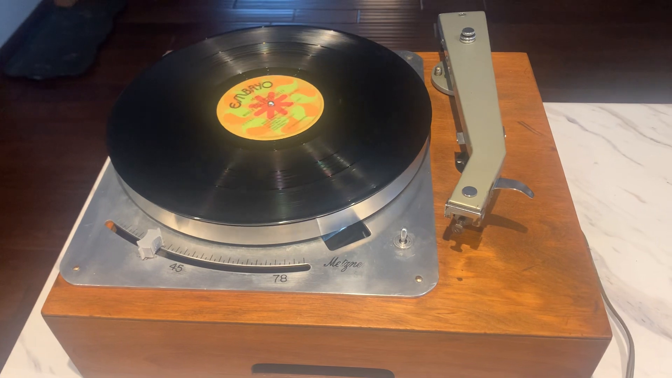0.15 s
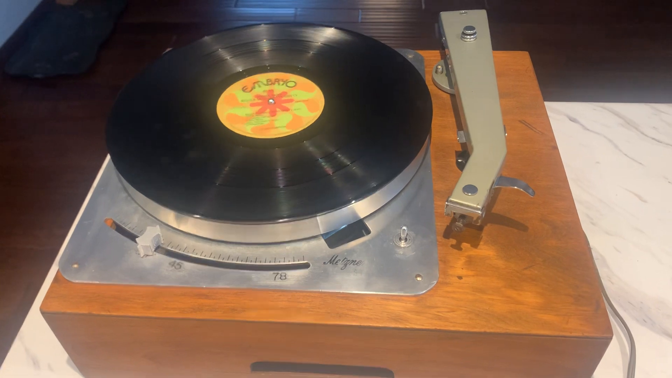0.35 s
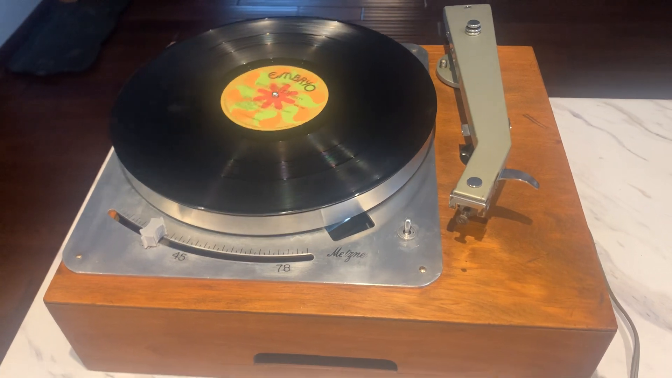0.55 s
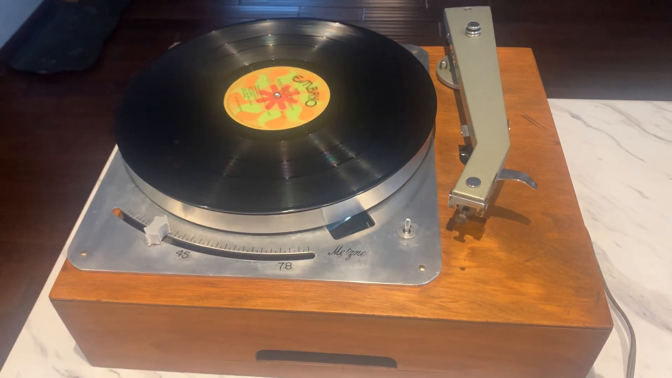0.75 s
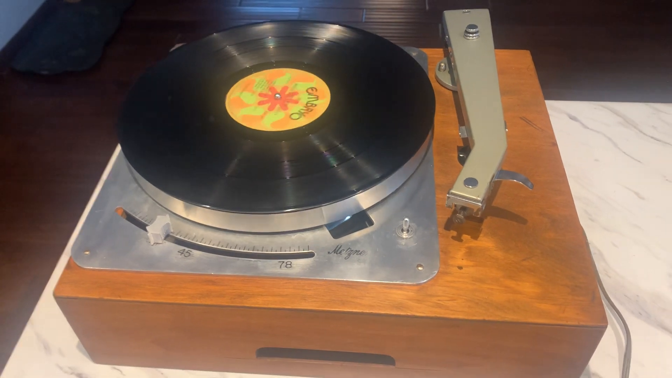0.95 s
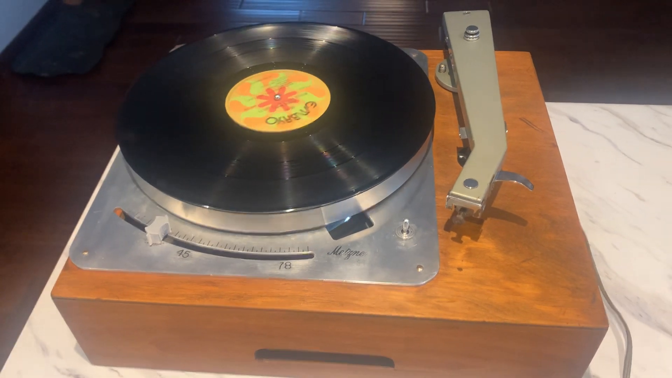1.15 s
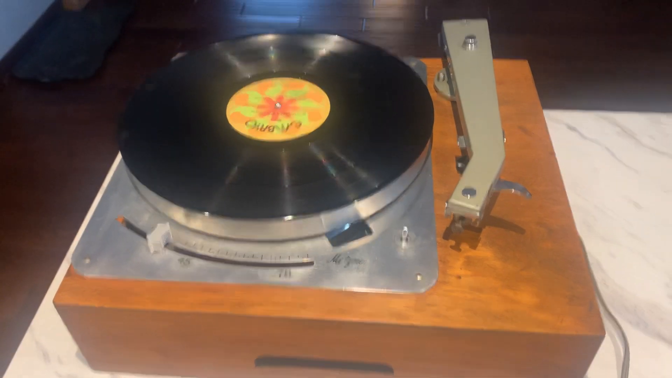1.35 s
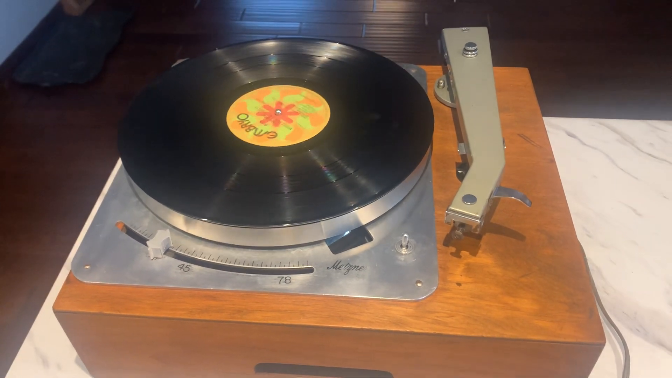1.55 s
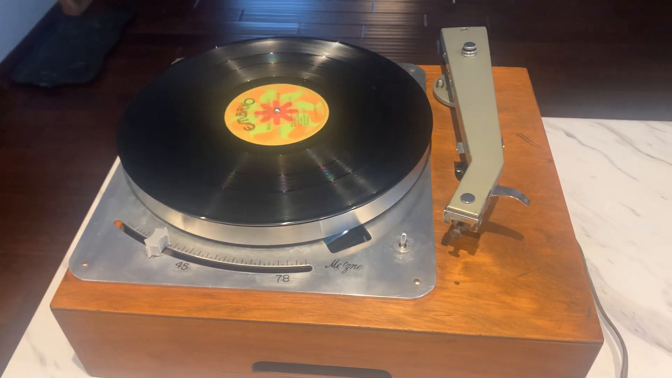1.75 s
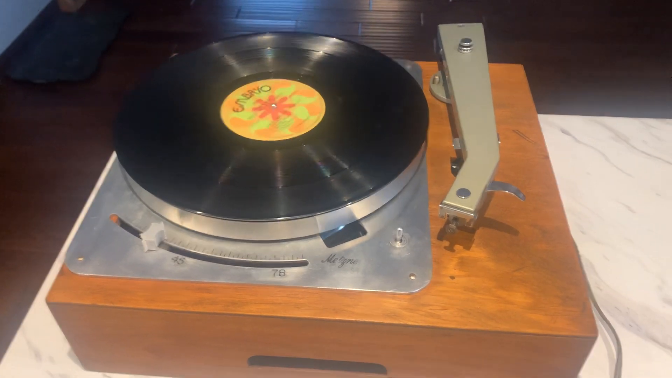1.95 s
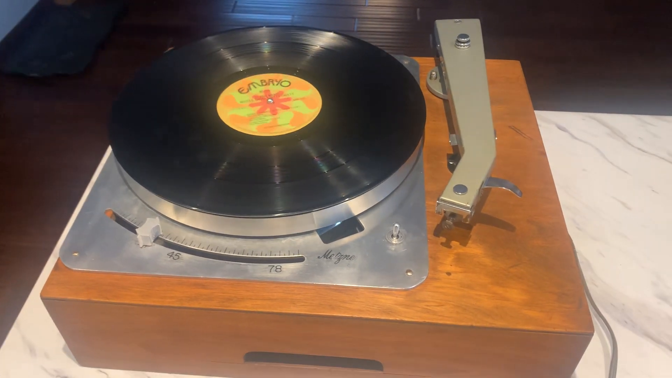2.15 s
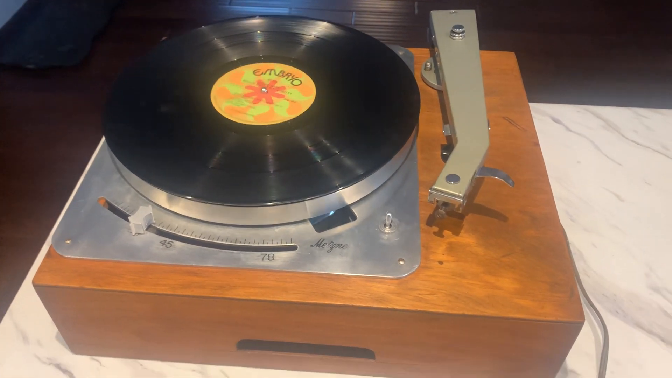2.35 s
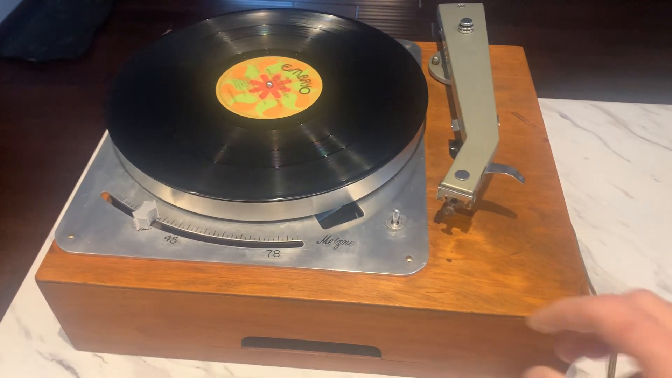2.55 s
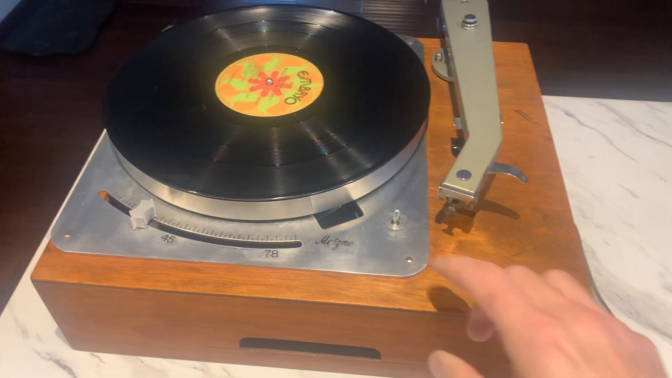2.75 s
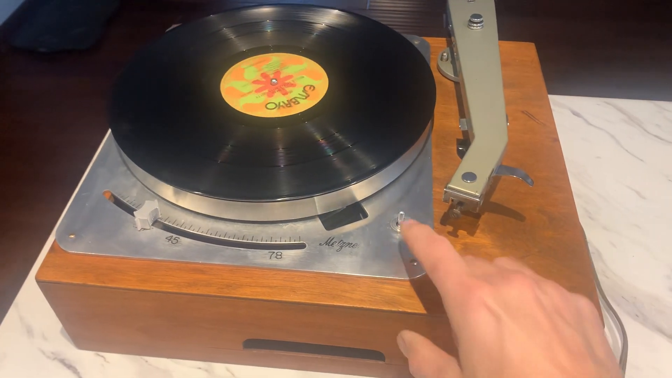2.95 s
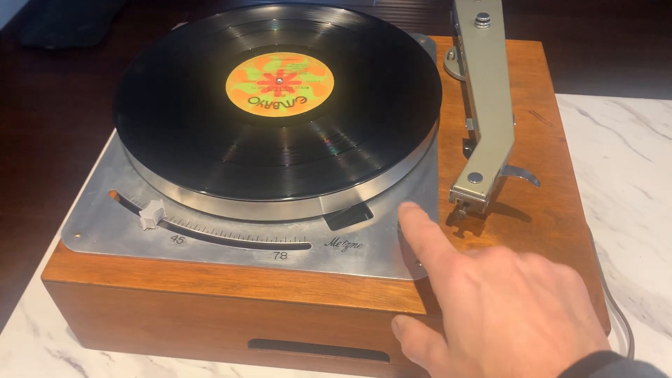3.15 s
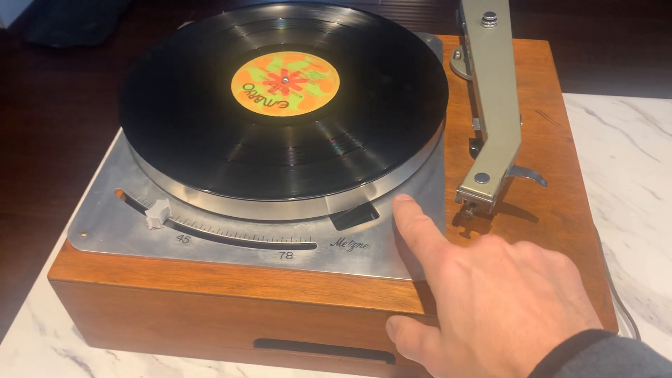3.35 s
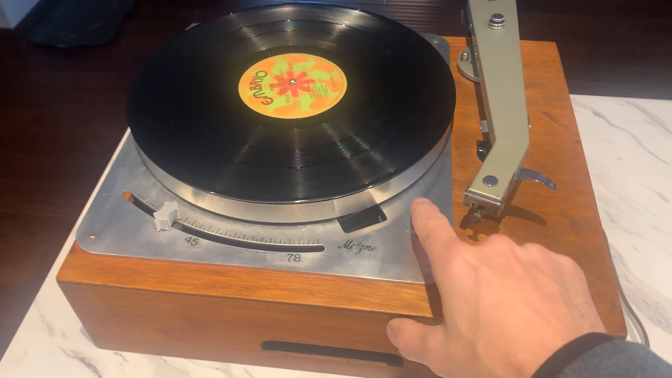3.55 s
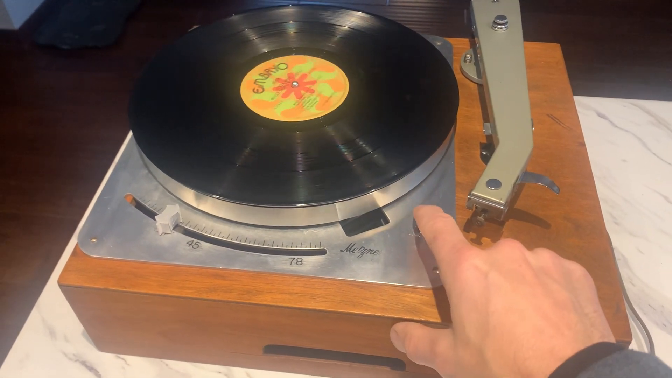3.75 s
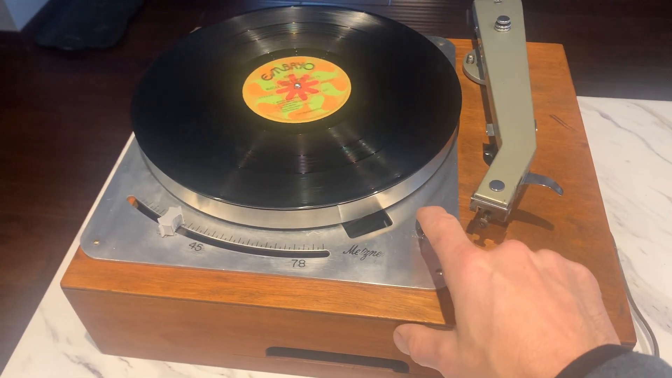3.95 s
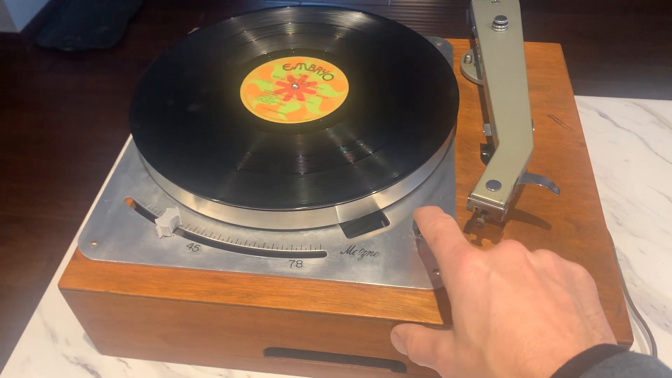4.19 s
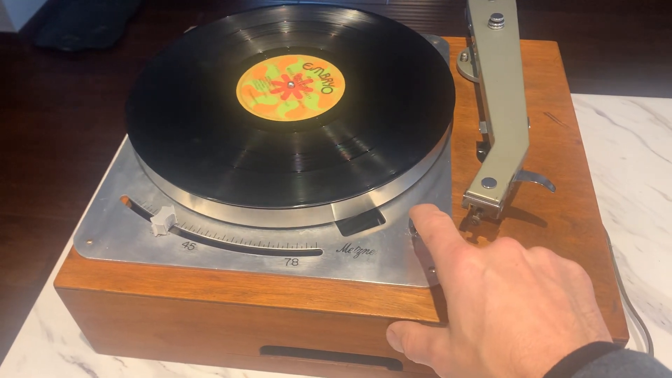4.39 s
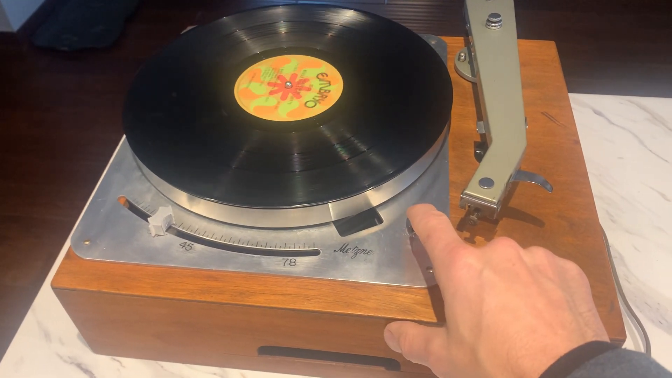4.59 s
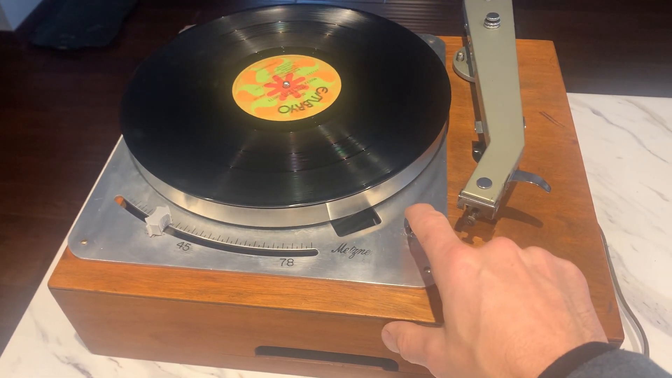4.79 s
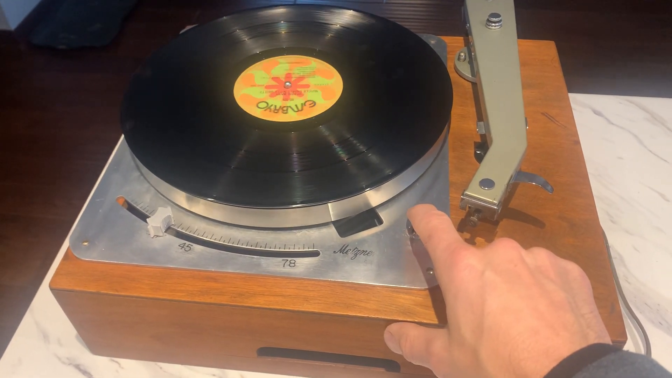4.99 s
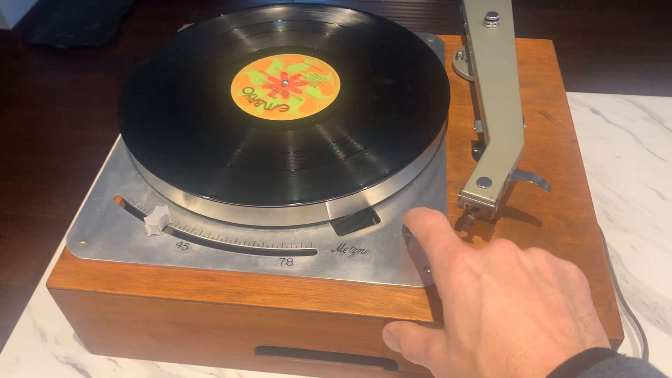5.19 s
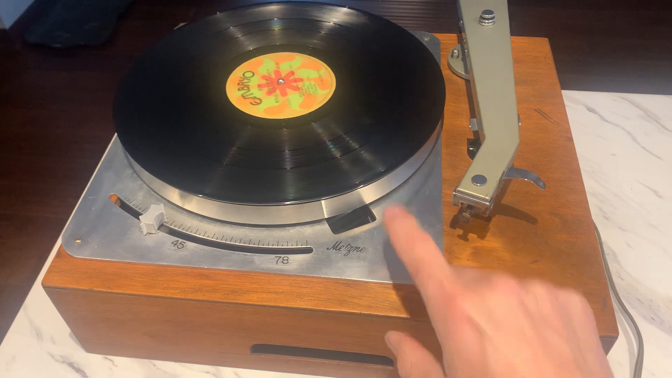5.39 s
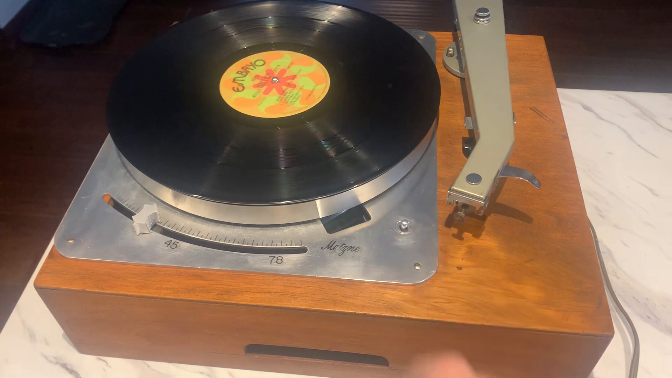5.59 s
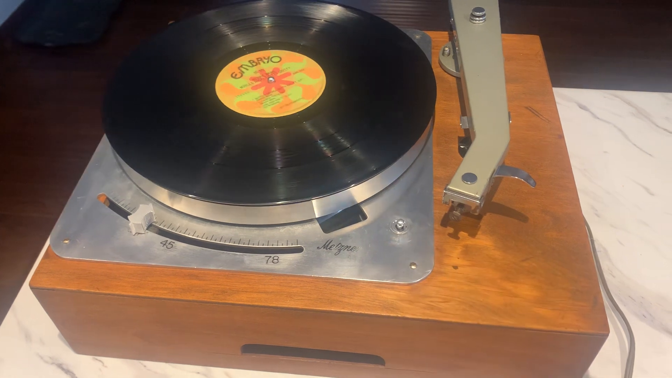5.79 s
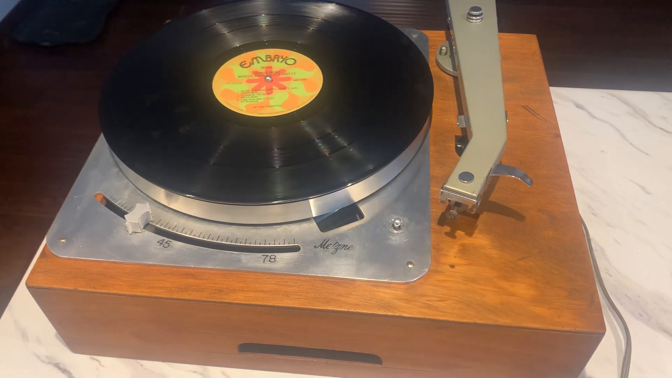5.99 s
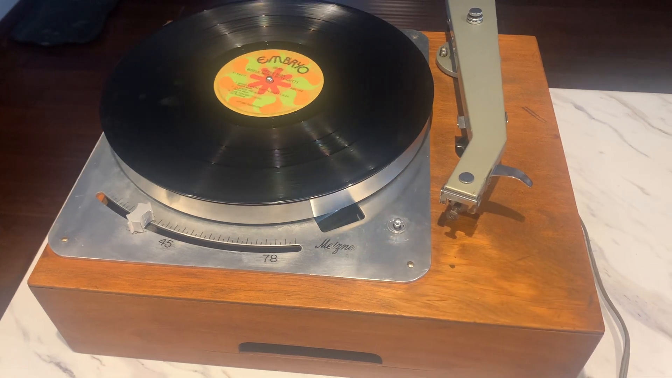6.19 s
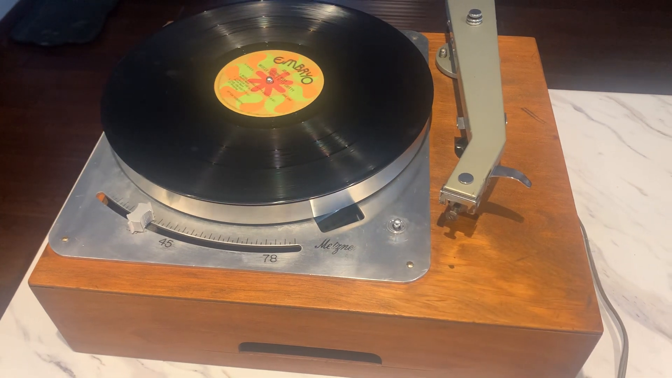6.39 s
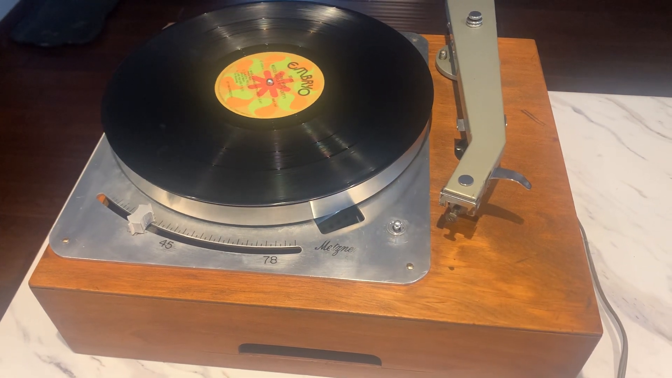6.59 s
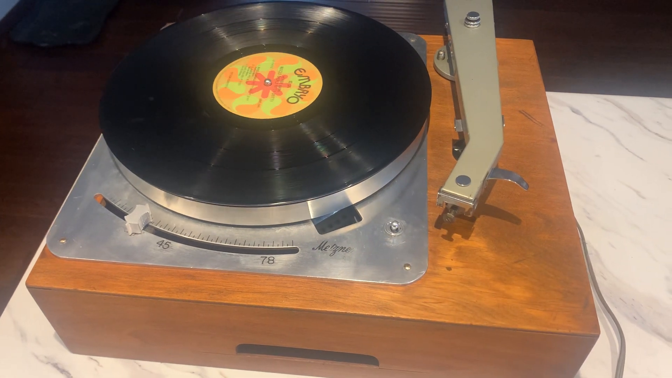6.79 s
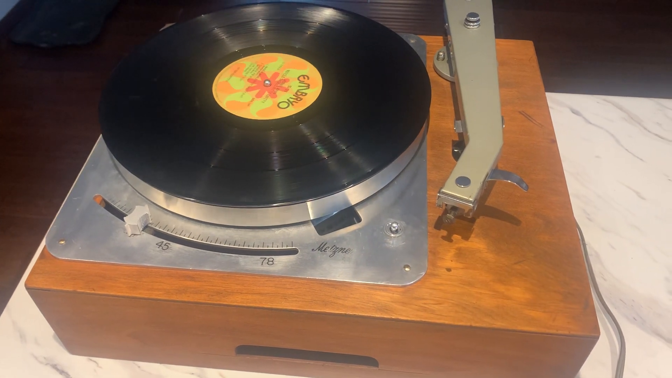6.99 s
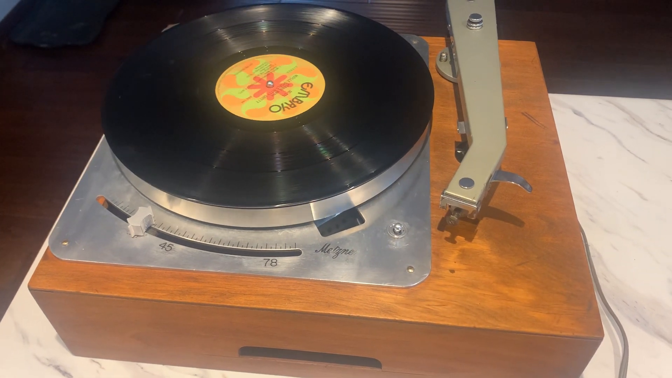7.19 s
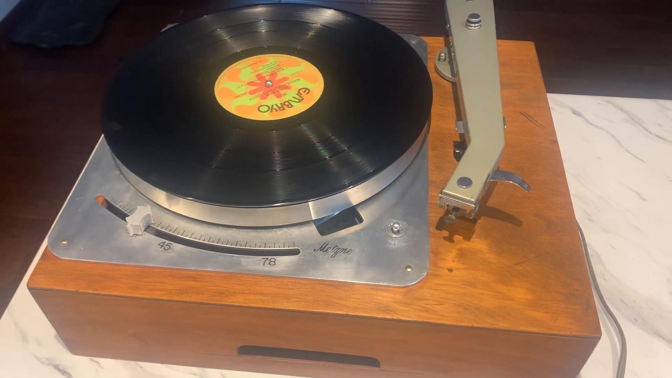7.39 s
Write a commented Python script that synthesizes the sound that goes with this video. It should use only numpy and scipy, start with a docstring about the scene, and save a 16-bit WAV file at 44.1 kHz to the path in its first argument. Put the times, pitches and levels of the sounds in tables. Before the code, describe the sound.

From the start, an old turntable motor gives a low, steady 120 Hz hum with soft, slightly uneven bearing rumble, over a faint low room drone. Across the room a clock ticks quietly about once a second, from 0.2 s to the end, each step a tiny cluster of dry clicks blurred by the room. Soft sleeve rustles and small grip knocks come close to the microphone at 0.2-0.7 and 1.0-1.2 s; a stronger dull double knock with clicks falls at 1.97 s, and a tiny click at 2.25 s. At 2.85 s a fingertip lands with a faint nail tick and a muffled low thud. At 5.1 s the toggle switch snaps, by far the loudest event: a bright crack with woody, metallic body, thin steel ringing and a short room echo. The hum and rumble die within half a second, leaving low room drone and clearer ticking until about 7.4 s.

```python
"""A room with a stone table, where an old turntable hums until a finger on its toggle switch snaps it off.
The motor is a sum of mains harmonics over bearing noise; the snap is bouncing noise bursts, and rings the deck's modes.
A clock across the room steps once a second, as damped noise carried by the reverberation, over a low steady drone.
The hand that holds the camera knocks its case, as decaying sines and clicks, and a sleeve brushes as shaped noise."""
import sys
import numpy as np
from scipy import signal
from scipy.fft import rfft, irfft, next_fast_len
from scipy.io import wavfile
from scipy.ndimage import uniform_filter1d, map_coordinates

SR = 44100
rng = np.random.default_rng(int(sys.argv[2]) if len(sys.argv) > 2 else 0)


def master(y):
    """Save y as 16-bit WAV."""
    cut = np.clip(np.atleast_2d(y).T, -1, 1)
    pcm = np.round(cut * 32767)  # scale
    wavfile.write(sys.argv[1], SR, pcm.astype(np.int16))


N = 328015  # length of the scene in samples


def amp(db):
    """Level and amplitude: 20 dB is a factor of ten."""
    return 10 ** (np.asarray(db) / 20)


def unit(x):
    """Normalization: scale to rms 1."""
    return x / np.sqrt(np.mean(x ** 2) + 1e-20)


def along(points, hz):
    """Logarithmic pitch scale: interpolate (Hz, value) points on a log-frequency axis."""
    point_hz, value = np.transpose(points)
    return np.interp(np.log(hz + 1), np.log(point_hz + 1), value)


def seconds(size):
    """Sampling: the time of each sample."""
    return np.arange(size) / SR


def fade(t, t60):
    """Exponential decay: from t = 0, the level falls 60 dB in t60 seconds."""
    return (t >= 0) * np.exp(-np.log(1000) * np.abs(t) / t60)


def wobble(rate):
    """Slow random fluctuation: a smooth curve through rate random knots a second."""
    knots = rng.standard_normal(int(N * rate / SR) + 4)
    return map_coordinates(knots, [seconds(N) * rate])


def filtered(x, response):
    """Linear filtering: multiply the spectrum by a response of frequency."""
    size = x.shape[-1]
    padded = next_fast_len(size + SR // 4)
    spectrum = rfft(x, padded) * response(np.fft.rfftfreq(padded, 1 / SR))
    return irfft(spectrum, padded)[..., :size]


# likeness of the two microphone ports in a diffuse field, clipped to 1 when read
# columns: pitch_hz [Hz], correlation [1]
COHERENCE = [(60, 1.1), (140, 0.68), (290, 0.92), (640, 0), (1400, 0), (15000, 0)]


def noise(spectrum, size):
    """Diffuse-field coherence: stereo noise of rms 1, alike in the bass and unrelated in the treble."""
    def colour(hz):
        turn = np.arccos(np.clip(along(COHERENCE, hz), -1, 1)) / 2
        return amp(along(spectrum, hz)) * np.array([np.cos(turn), np.sin(turn)])

    mid, side = filtered(rng.standard_normal((2, size)), colour)
    return unit(np.array([mid + side, mid - side]))


def cluster(hz, width_hz, size):
    """Modal overlap: many close modes beat against each other as narrow-band stereo noise of rms 1."""
    band = lambda f: np.exp(-((f - hz) / width_hz) ** 2 / 2)
    return unit(filtered(rng.standard_normal((2, size)), band))


def pan(lean_db):
    """Interaural level difference: left and right gains, lean_db apart."""
    return amp(np.array([lean_db, -lean_db]).reshape(2, -1) / 2)


def add(track, s, sound):
    """Superposition: mix a sound into the track at time s."""
    part = track[:, round(s * SR):][:, :sound.shape[-1]]
    part += sound[..., :part.shape[-1]]


def tilted(spectrum, db_per_octave):
    """Spectral tilt: make a spectrum brighter or duller about 1000 Hz."""
    return [(hz, db + db_per_octave * np.log2(hz / 1000)) for hz, db in spectrum]


def patchy(x, depth_db):
    """Band-wise amplitude modulation: each narrow band of a noise swells and sinks by itself."""
    z = signal.stft(x, nperseg=2048)[2]
    field = rng.standard_normal(z.shape[1:])
    field = uniform_filter1d(field, size=4, axis=0)  # over frequency
    field = uniform_filter1d(field, size=5, axis=1)  # over time
    return unit(signal.istft(z * amp(depth_db * unit(field)))[1][:, :N])


# decay of the room by frequency
# columns: pitch_hz [Hz], t60_s [s]
ROOM_DECAY = [(150, .35), (500, 0.44), (1500, 0.45), (4000, 0.41), (7000, 0.35), (11000, 0.29),
              (16000, .24)]


def reverberation(spectrum, build):
    """Statistical reverberation: reflections build up, then each band decays; left energy 1."""
    hz, t, z = signal.stft(noise(spectrum, SR), SR, nperseg=256)
    decay = fade(t, along(ROOM_DECAY, hz)[:, None])
    tail = signal.istft(z * decay, SR)[1][:, :SR]
    tail = tail * (1 - np.exp(-seconds(SR) / build))
    return tail / np.linalg.norm(tail[0])


HUM_HZ = 120  # the magnetic pull
# harmonics of the motor's hum, before wavering and panning
# columns: harmonic [multiple of HUM_HZ], level_db [dB rms]
HUM_HARMONICS = [(1, -50.5), (2, -78.5), (3, -82), (5, -90.5)]
# spectral shape of the bearing rumble
# columns: pitch_hz [Hz], relative_density_db [dB per Hz]
BEARING_SPECTRUM = [(40, -20), (110, 2.5), (170, 0), (225, 1), (300, -4), (330, -12.5), (390, -7.5),
                    (450, -13.5), (500, -5.5), (540, -19), (700, -23.5), (740, -13.5), (790, -23.5),
                    (1300, -32), (6000, -53.5)]


def motor():
    """Magnetostriction and friction: harmonic hum dies with the current while bearing rumble coasts on."""
    t = seconds(N)
    since_off = np.maximum(t - CONTACT_BOUNCES[0][0], 0)
    phase = 2 * np.pi * HUM_HZ * t + 0.028 * wobble(2.9)
    hum = sum(amp(db) * np.sqrt(2) * np.sin(k * phase) for k, db in HUM_HARMONICS)
    hum = hum * amp(0.16 * wobble(4.6)) * fade(since_off, t60=0.28)
    rumble_level = amp(-64.5 + 1.0 * wobble(4.7) + 1.6 * wobble(15))
    rumble = patchy(noise(BEARING_SPECTRUM, N), depth_db=1.5) * rumble_level
    rumble = rumble * fade(since_off, t60=0.5)
    return hum * pan(lean_db=-3.0) + rumble * pan(lean_db=-1.0)


# tones of the steady drone, before wavering and leaning
# columns: pitch_hz [Hz], level_db [dB rms]
DRONE_TONES = [(53.1, -62.5), (83.4, -58), (149.7, -66.5), (205.3, -79.5), (221, -75), (293, -75),
               (409.3, -78), (823.6, -91)]
# spectral shape of the still air
# columns: pitch_hz [Hz], relative_density_db [dB per Hz]
AIR_SPECTRUM = [(20, -23.5), (35, -14), (50, -3.5), (90, -2), (130, -6.5), (190, -12), (300, -19.5),
                (430, -22), (560, -30.5), (780, -31.5), (1100, -41.5), (1600, -45.5), (5000, -49.5),
                (8000, -57.5), (11000, -50), (15000, -63)]
# spectral shape of an uneven rush in the room
# columns: pitch_hz [Hz], relative_density_db [dB per Hz]
RUSH_SPECTRUM = [(120, -12), (250, 0), (420, -1), (600, -7), (800, -8.5), (1100, -19.5), (2000, -28.5),
                 (4000, -50)]
# stereo lean of the room tone
# columns: pitch_hz [Hz], left_minus_right_db [dB]
ROOM_LEAN = [(100, -4), (220, -0.5), (700, -1), (1500, 2), (5000, -0.5)]


def room_tone():
    """Background noise: wavering tones, still air and a lumpy rush, leaning right in the bass."""
    t = seconds(N)
    drone = np.zeros(N)
    for hz, db in DRONE_TONES:
        level = amp(db + 0.33 * wobble(4.5)) * np.sqrt(2)
        drone += level * np.sin(2 * np.pi * (hz * t + rng.random()) + 0.08 * wobble(3.3))
    air = amp(-57.0) * noise(AIR_SPECTRUM, N)
    rush_level = amp(-71 + 1.3 * wobble(4.6) + 1.5 * wobble(12))
    rush = rush_level * patchy(noise(RUSH_SPECTRUM, N), depth_db=4.5)
    return filtered(drone + air + rush, lambda hz: pan(along(ROOM_LEAN, hz)))


# knocks of the grip on the camera case
# columns: start_s [s], level_db [dB], thud_pitch_hz [Hz], tap_over_thud_db [dB], click_over_thud_db [dB]
GRIP_KNOCKS = [(0.19, -47.5, 640, -27, -38), (1.01, -41.5, 564, -19, -14), (1.056, -49.5, 530, -25, -35),
               (1.918, -37.5, 770, -32, -19), (1.924, -41, 870, -30, -15), (1.9697, -25, 592, -3, -16.5),
               (1.9859, -35, 560, -13, -16)]
# a short high tap comes first, then the finger settles with a lower thud
TAP_RATIO, SETTLE_S, KNOCK_ATTACK_S = 2.24, 0.00257, 0.00037
KNOCK_CYCLES = 10  # the hand damps tap and thud by 60 dB in this many cycles
# dry clicks of the case under the grip
# columns: start_s [s], level_db [dB], tilt_db_per_octave [dB per octave]
CASE_CLICKS = [(1.44, -57, 0), (1.533, -60.5, 2), (1.952, -60, 3), (1.9663, -52.5, 1), (1.9866, -42, 0),
               (2.2456, -52, 2)]
# spectral shape of a click of the case
# columns: pitch_hz [Hz], relative_density_db [dB per Hz]
SHELL_SPECTRUM = [(500, 22.5), (2500, -0.5), (5000, 6), (7200, -3), (8400, 4), (10500, -4), (16000, -17)]
# sleeve strokes, before their roughness
# columns: middle_s [s], half_length_s [s], level_db [dB], tilt_db_per_octave [dB per octave]
SLEEVE_STROKES = [(0.292, 0.033, -59, -4), (0.367, 0.037, -61.5, 0.5), (0.409, .028, -58.5, -3.5),
                  (0.474, 0.048, -67, 0), (0.574, 0.066, -61.5, 0.6), (0.662, 0.044, -65, -1.5),
                  (1.05, 0.067, -67.5, 2), (1.149, 0.03, -65, 1), (1.19, .016, -58.5, -10),
                  (1.961, 0.051, -59.5, 1)]
# spectral shape of the cloth
# columns: pitch_hz [Hz], relative_density_db [dB per Hz]
CLOTH_SPECTRUM = [(150, -21), (500, 11), (800, 5), (1300, -4.5), (2200, -8.5), (3500, -16.5), (5000, -16),
                  (8000, -31), (11500, -25.5), (16000, -43)]


def handling():
    """Damped impact and friction: the grip thuds on the camera case without echo; the sleeve brushes roughly."""
    out, t = np.zeros((2, N)), seconds(SR // 8)

    def click(tilt):
        return noise(tilted(SHELL_SPECTRUM, tilt), len(t)) * fade(t, t60=0.022)

    def thud(hz):
        attack = 1 - np.exp(-t / KNOCK_ATTACK_S)
        return np.sin(2 * np.pi * hz * t) * fade(t, KNOCK_CYCLES / hz) * attack

    for s, db, hz, tap_db, click_db in GRIP_KNOCKS:
        add(out, s, amp(db + tap_db) * thud(hz * TAP_RATIO) + amp(db + click_db) * click(0))
        add(out, s + SETTLE_S, amp(db) * thud(hz))
    for s, db, tilt in CASE_CLICKS:
        add(out, s, amp(db) * click(tilt))

    sleeve, age = np.zeros((2, N)), seconds(SR // 2) - 1 / 4  # age is 0 mid-stroke
    for s, half, db, tilt in SLEEVE_STROKES:
        pressure = amp(db) * np.exp(-(age / half) ** 4)
        add(sleeve, s + age[0], pressure * noise(tilted(CLOTH_SPECTRUM, tilt), len(age)))
    roughness = amp(1.1 * wobble(90) + 1.5 * wobble(25.26))
    return out + sleeve * roughness


# the clock steps tick and tock in turn; the tock comes a little late
FIRST_TICK_S, BEAT_S, TOCK_LATE_S = 0.234, 1, 0.011
# contacts of one step: release, stop and rebound
# columns: after_release_s [s], relative_level_db [dB]
STEP_CONTACTS = [(0, 0.5), (.023, 7), (.049, 1.5)]
# strength of each step in turn
# column: relative_level_db [dB]
STEP_STRENGTHS = [-63, -65, -62, -57, -60.5, -57.5, -57.5, -61]
# spectral shape of the tick as it arrives through the room
# columns: pitch_hz [Hz], relative_density_db [dB per Hz]
TICK_SPECTRUM = [(300, 5.5), (750, 5.5), (1050, -2), (1380, 6), (1900, -8.5), (2300, -8.5), (2900, 2.5),
                 (3900, -10), (4700, 2), (5700, -5), (7000, -12.5), (7700, -10.5), (8700, -27),
                 (11000, -12), (15500, -39)]


def clock():
    """Reverberant field: release, stop and rebound each ring the clock's case, heard through the room."""
    out, t = np.zeros((2, N)), seconds(SR // 8)
    for beat, db in enumerate(STEP_STRENGTHS):
        tock = beat % 2
        s = FIRST_TICK_S + beat * BEAT_S + tock * TOCK_LATE_S
        for delay, contact_db in STEP_CONTACTS:
            # dense short modes, woken anew by each contact
            case = rng.standard_normal((1, len(t))) * fade(t, t60=0.076)
            # the extra fade shortens the room's decay
            room = reverberation(TICK_SPECTRUM, build=0.0014) * fade(seconds(SR), t60=1.0)
            contact = signal.fftconvolve(case, room, axes=1)
            loudness = contact[:, :SR // 20].std()
            add(out, s + delay, amp(db + contact_db - 9.0) * contact / loudness)
    return out


# blows on the deck: a fingernail, the fingertip landing and settling, the switch
# columns: start_s [s], relative_level_db [dB], softness_corner_hz [Hz]
DECK_BLOWS = [(2.8437, -49, 9100), (2.845, -27, 610), (2.871, -11.5, 202), (5.101, -1, 16000)]
# low modes of the deck on its wooden plinth, for a blow of 0 dB
# columns: pitch_hz [Hz], relative_level_db [dB], t60_s [s], left_minus_right_db [dB]
DECK_MODES = [(159.2, -27, 0.13, -2), (194, -22.5, 0.16, -1), (228, -26, 0.16, -1),
              (249.7, -27, 0.17, -0.5), (270, -13.5, 0.04, 0), (283, -30, 0.13, -0.5),
              (316, -29, 0.17, -1.5), (389, -35.5, .15, -1.5), (434, -40, .14, -1),
              (480, -28.5, 0.16, -2.5), (502, -21.5, .125, -1), (620, -28, 0.05, 0), (685, -29, 0.046, 2),
              (868, -36.5, 0.11, 3), (1046, -40, 0.21, 6), (1110, -44, 0.2, 2), (1150, -31.5, 0.0814, 6.5),
              (1231, -34, 0.13, 5.5), (1363.5, -20.5, 0.09, 3.5), (1403, -25, 0.05, 4.5),
              (1476, -24.5, 0.084, 3), (1756, -29, .055, 1.5), (1850, -29, .07, 0.5),
              (1885, -30, 0.095, 1.5)]
# crowded high modes of the metal plate
# columns: pitch_hz [Hz], width_hz [Hz], relative_level_db [dB], t60_s [s]
PLATE_MODES = [(2100, 110, -30.5, 0.067), (2260, 40, -27, 0.073), (2400, 60, -32, .06),
               (2744, 35, -23.5, .06), (3087, 80, -27.5, 0.065), (3590, 59, -28.5, 0.033),
               (4350, 130, -29.5, 0.045), (5098, 550, -26.5, 0.074), (6705, 450, -25.5, 0.096),
               (7505, 88, -25.5, .045), (10700, 220, -27.5, 0.069), (11800, 310, -29.5, 0.07),
               (15200, 350, -30, .07)]
# spectral shape of the loose parts
# columns: pitch_hz [Hz], relative_density_db [dB per Hz]
CLATTER_SPECTRUM = [(60, -28.5), (130, -5.5), (250, 2), (360, -10.5), (560, -18), (650, -8.5), (790, -17),
                    (1000, -5), (1300, -5), (1650, -9), (2400, -10), (4000, -17.5), (11000, -21.5),
                    (16000, -26)]


def deck():
    """Modal excitation: each blow rings plinth, plate and loose parts; a soft finger wakes only low modes."""
    out, t = np.zeros((2, N)), seconds(SR // 2)
    ring = np.zeros((2, len(t)))
    for k, (hz, db, t60, lean_db) in enumerate(DECK_MODES):
        # bending waves are slow in the bass, so low modes start late and swell
        age = np.maximum(t - 0.05 / np.sqrt(hz), 0)
        swell = 1 - np.exp(-age * hz / 0.5)
        sign = (-1) ** k  # neighbours swing in turn up and down
        ring += sign * amp(db) * pan(lean_db) * swell * fade(age, t60) * np.sin(2 * np.pi * hz * age)
    for s, db, soft_hz in DECK_BLOWS:
        plate = np.zeros((2, len(t)))
        for hz, width, level_db, t60 in PLATE_MODES:
            plate += amp(level_db) * cluster(hz, width, len(t)) * fade(t, t60)
        clatter = amp(-19) * pan(lean_db=1.5) * noise(CLATTER_SPECTRUM, len(t))
        clatter = clatter * fade(t, t60=0.14) * (1 - np.exp(-t / 0.0036))
        softness = signal.butter(6, min(soft_hz, SR / 2 - 1), fs=SR, output="sos")
        add(out, s, amp(db) * signal.sosfilt(softness, ring + amp(3) * plate + clatter))
    return out


# the switch spring throws the contacts over and they bounce
# columns: start_s [s], relative_level_db [dB], t60_s [s], low_cut_hz [Hz]
CONTACT_BOUNCES = [(5.0983, -2, .012, 4500), (5.0994, 2, .005, 900), (5.1016, -7, .016, 300)]
# spectral shape of the contacts' snap
# columns: pitch_hz [Hz], relative_density_db [dB per Hz]
SNAP_SPECTRUM = [(150, -37), (800, -16), (2000, 0), (3100, -4.5), (3700, -7.5), (5700, -5), (7100, 9),
                 (7800, 0), (8600, -10), (10400, 9), (12000, 4.5), (13400, -11), (15100, 2.5), (16500, -16)]
# thin, lasting rings of the switch spring and the tone arm
# columns: pitch_hz [Hz], peak_level_db [dB], t60_s [s]
SPRING_RINGS = [(2050, -44.5, 0.38), (2690, -37, .22), (3110, -47, .28), (3570, -52.5, .33),
                (4130, -53, .25), (4445, -53, .28), (5000, -46, .2), (5500, -48.5, .18), (6550, -39.5, .19),
                (7424, -44, .17), (7822, -42, 0.11), (10400, -34, 0.14), (10610, -40, .15)]
# the fingernail ticks on the toggle lever as it lands
NAIL_DB, NAIL_HZ, NAIL_WIDTH_HZ = -57, 2620, 70


def switch():
    """Contact bounce: a nail ticks on the lever; later the contacts snap, thin then fuller, and steel rings."""
    out, t = np.zeros((2, N)), seconds(SR // 2)
    nail = cluster(NAIL_HZ, NAIL_WIDTH_HZ, len(t)) * fade(t, t60=0.069)
    add(out, DECK_BLOWS[0][0], amp(NAIL_DB) * nail)
    for s, db, t60, cut_hz in CONTACT_BOUNCES:
        thin = signal.butter(2, cut_hz, "high", fs=SR, output="sos")
        burst = noise(SNAP_SPECTRUM, len(t)) * fade(t, t60)
        add(out, s, amp(db - 7) * signal.sosfilt(thin, burst))
    for hz, db, t60 in SPRING_RINGS:
        ring = np.sin(2 * np.pi * (hz * t + rng.random((2, 1))))
        add(out, CONTACT_BOUNCES[1][0], amp(db) * fade(t, t60) * ring)
    return out


# spectral shape of the room's echo of the turntable
# columns: pitch_hz [Hz], relative_density_db [dB per Hz]
ECHO_SPECTRUM = [(80, -8.5), (170, 4), (300, 5.5), (500, -3), (750, 5.5), (1100, 6.5), (1500, 3.5),
                 (2700, 3), (3800, 7), (5600, 8), (6800, 3), (11000, -2.5), (16000, -4)]


def scene():
    """Direct and reverberant sound: switch and deck fill the room, over the other sources."""
    near = switch() + deck()
    echo = signal.fftconvolve(near, reverberation(ECHO_SPECTRUM, build=0.005), axes=1)[:, :N]
    return near + amp(-13.5) * echo + motor() + room_tone() + handling() + clock()


CEILING = 0.88  # largest swing that the camera can take, as a share of full scale
TOP_HZ = 16000  # band limit of the camera


def record(dry):
    """Saturation and band limiting: the camera rounds off high peaks, then cuts steeply above its band limit."""
    rounded = dry / (1 + np.abs(dry / CEILING) ** 6) ** (1 / 6)
    return filtered(rounded, lambda hz: 1 / np.sqrt(1 + (hz / TOP_HZ) ** 120))


dry = scene()
out = record(dry)
master(out)
```